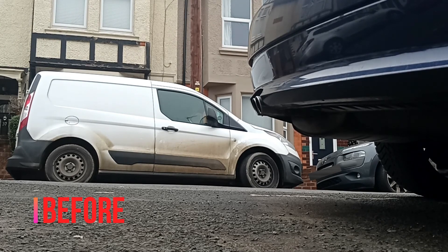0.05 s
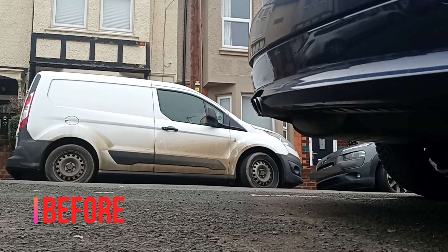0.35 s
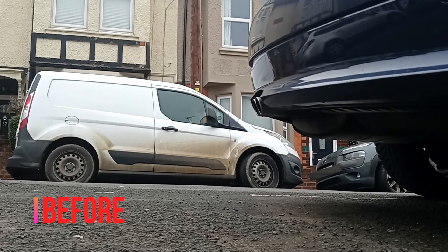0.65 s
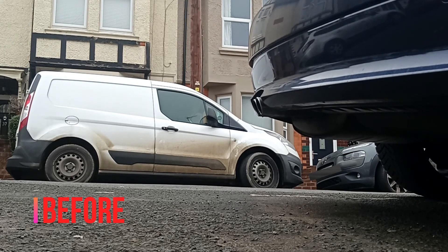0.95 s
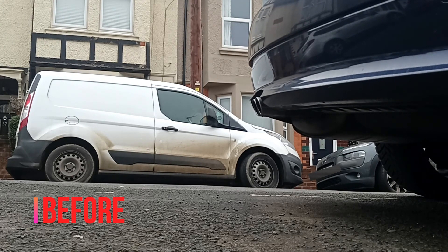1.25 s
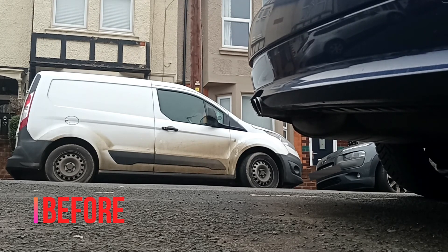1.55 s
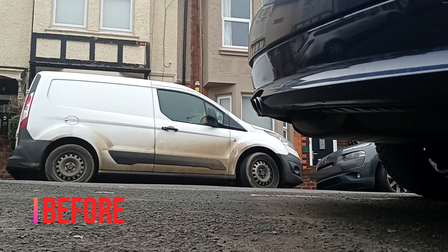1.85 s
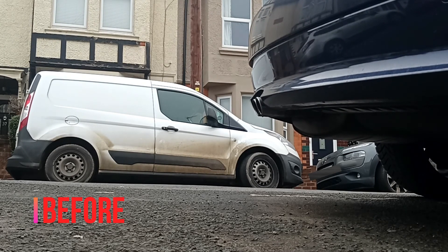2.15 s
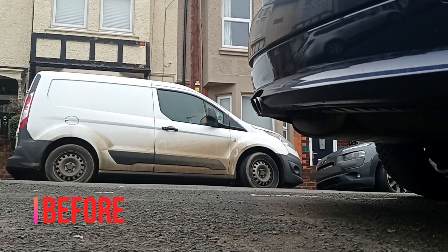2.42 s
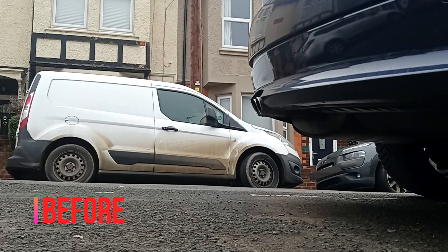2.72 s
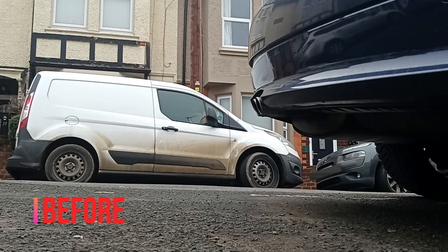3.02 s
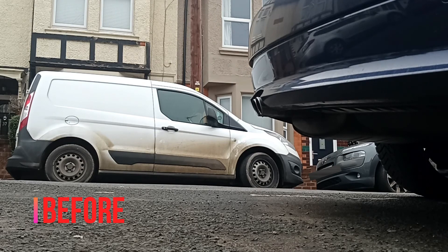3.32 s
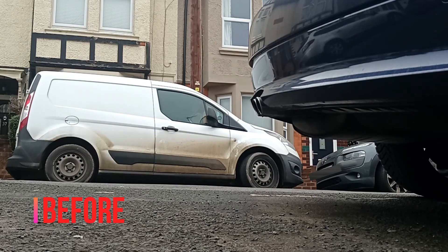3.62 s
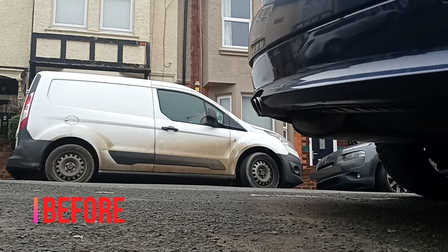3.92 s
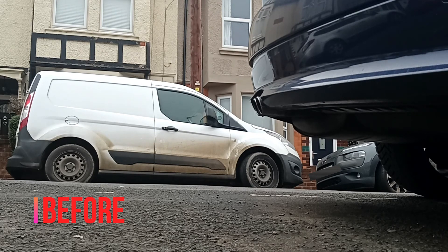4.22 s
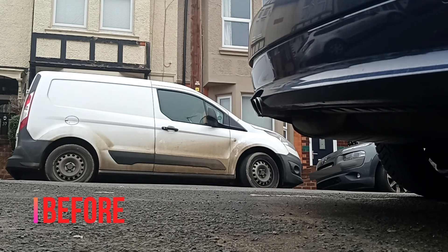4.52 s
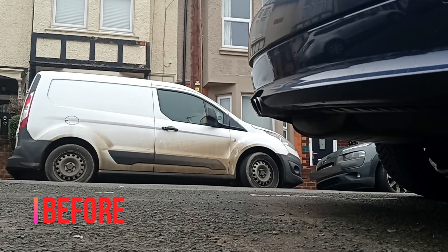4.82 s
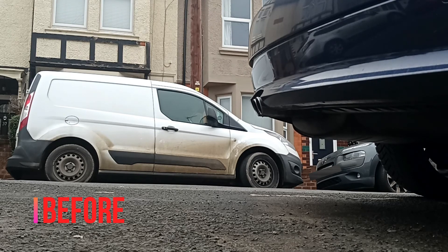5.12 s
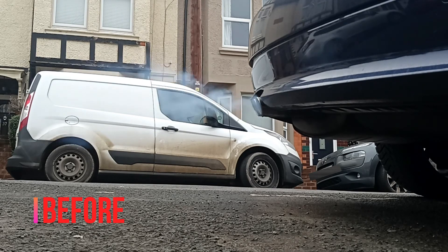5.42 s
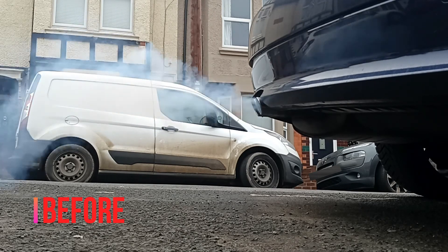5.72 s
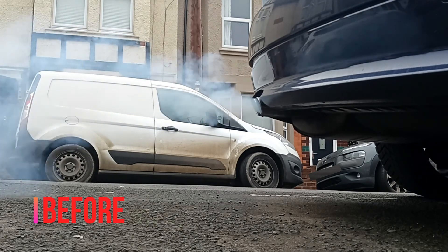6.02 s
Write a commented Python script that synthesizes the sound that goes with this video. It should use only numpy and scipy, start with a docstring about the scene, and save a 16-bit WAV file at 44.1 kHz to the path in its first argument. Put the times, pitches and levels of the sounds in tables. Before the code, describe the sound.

A faint, low hum of distant traffic lies under a quiet street, heard from the ground beside a car's tailpipe. For the first 2.5 seconds, keys jingle lightly in the cabin among small clicks, dull knocks and soft shuffling, with a sharper lock click and jingle at about 1.1 seconds. After a lull, the starter engages at 3.5 seconds with a gritty metallic clang. It cranks in quick, labouring surges, whining and clattering. At about 4.3 seconds the diesel engine catches with a close, loud roar and a hiss of exhaust gas, the loudest moment. It surges again near 4.8 seconds, then settles into a lumpy idle with a low throb, a rasping, ringing pipe and brief faint whistling notes. The engine stumbles for an instant around 5.6 seconds and is still running unevenly at the end, about 6 seconds in.

```python
"""Cold diesel start

A car starts in a street, heard from the ground beside its tailpipe. Keys jingle and controls
click in the cabin; the starter engages and labours as each piston squeezes its air. The four
cylinders catch with a roar and settle into a lumpy idle that rings the long exhaust pipe."""
import sys
import numpy as np
from scipy import signal
from scipy.fft import rfft, irfft, next_fast_len
from scipy.io import wavfile
from scipy.ndimage import map_coordinates

SR = 44100
rng = np.random.default_rng(int(sys.argv[2]) if len(sys.argv) > 2 else 0)


def waveform_to_disk(signal):
    """Save audio, clipped to [-1, 1], as 16-bit WAV at the path in sys.argv[1]."""
    frames = np.transpose(np.atleast_2d(signal))
    scaled = np.clip(frames, -1, 1) * 32767
    samples = np.round(scaled).astype(np.int16)
    wavfile.write(sys.argv[1], SR, samples)


N = 267373

# surges as the starter takes up the load and meets each compression:
# (time [s], length [s], load [dB], clatter [dB], drop in gear pitch [Hz], housing ring [dB])
STARTER_SURGES = [(3.505, 0.056, -32, -48.5, 5.56, -33.5), (3.588, 0.075, -35, -43.5, 12, -36),
                  (3.716, 0.062, -38.5, -39.5, 27.1, -41), (3.767, 0.058, -27, -43.5, 127, -53),
                  (3.908, .061, -27.5, -38.5, 89, -30), (4.045, 0.06, -28, -37, 76, -29),
                  (4.178, 0.077, -29.5, -37.5, 120, -29)]


def amp(db):
    """Turn decibels into a gain."""
    return 10 ** (np.asarray(db) / 20)


def unit(x):
    """Scale x to an average (rms) level of 1."""
    return x / np.sqrt(np.mean(x ** 2) + 1e-20)


def clock():
    """The time of every sample, in seconds."""
    return np.arange(N) / SR


def along(points, hz):
    """Read between (frequency, value) points on a logarithmic frequency scale."""
    freqs, values = np.transpose(points)
    return np.interp(np.log(hz + 1), np.log(np.abs(freqs) + 1), values)


def curve(points):
    """Join (time, value) points with straight lines."""
    return np.interp(clock(), *np.transpose(points))


def fade_in(start, length):
    """A ramp from 0 to 1."""
    return np.clip((clock() - start) / length, 0, 1)


def swell(start, length, rise_s, fall_s):
    """A level that rises, holds and dies away."""
    return fade_in(start, rise_s) * np.exp(-np.maximum(clock() - start - length, 0) / fall_s)


def burst(start, t60, attack):
    """The level of a blow: a quick rise, then a fall of 60 dB in t60 seconds."""
    age = np.maximum(clock() - start, 0)
    return np.exp(-np.log(1000) * np.minimum(age / t60, 10)) * (1 - np.exp(-age / attack))


def noise():
    """Fresh white noise."""
    return rng.standard_normal(N)


def wobble(rate):
    """A smooth curve through `rate` random values a second."""
    return map_coordinates(rng.standard_normal(int(N * rate / SR) + 4), [clock() * rate])


def tone(hz):
    """A slightly unsteady ringing note."""
    return np.sqrt(2) * np.sin(2 * np.pi * hz * clock() + 0.5 * wobble(90))


def filtered(x, response):
    """Multiply each frequency in x by response(frequency)."""
    size = next_fast_len(N + SR // 2)
    return irfft(rfft(x, size) * response(np.fft.rfftfreq(size, 1 / SR)), size)[..., :N]


def coloured(x, spectrum):
    """Shape x with (frequency [Hz], level [dB]) points, then scale it to level 1."""
    return unit(filtered(x, lambda hz: amp(along(spectrum, hz))))


def resonate(x, modes):
    """Let x ring resonances given as (pitch [Hz], width [Hz], level [dB]); scale to level 1."""
    return unit(filtered(x, lambda f: sum(
        (-1) ** k * amp(db) * 1j * f * width / (hz * hz - f * f + 1j * f * width)
        for k, (hz, width, db) in enumerate(modes))))


def low_pass(hz, edge_hz, steepness):
    """A gain near 1 below the edge and near 0 above it."""
    return 1 / (1 + (hz / edge_hz) ** steepness)


def street():
    """A low, slowly shifting hum of distant traffic."""
    # traffic hum: (frequency [Hz], level [dB])
    spectrum = [(12, -53), (20, -35), (37, -18), (90, -1), (153, -10.5), (259, -12), (306, -16.5),
                (352, -14), (393, -16.5), (519, -18.5), (811, -22.5), (958, -21), (8170, -42.5),
                (15500, -50.5)]
    # how alike left and right are: (frequency [Hz], likeness [-1 to 1])
    likeness = [(60, 0.86), (240, 0.88), (950, -0.18), (3770, 0.053), (15000, -0.079)]
    angle = lambda hz: np.arccos(np.clip(along(likeness, hz), -1, 1)) / 2
    shares = lambda hz: np.array([np.cos(angle(hz)), np.sin(angle(hz))])
    mid, side = filtered(np.array([noise(), noise()]), shares)
    hum = coloured(np.array([mid + side, mid - side]), spectrum)
    return amp(-59 + 1.8 * wobble(2.35)) * amp([[-0.5], [0.5]]) * hum


def keys():
    """Each jog clashes and rings the keys; they swing back and touch again, ever more softly."""
    # jogs of the bunch: (time [s], level [dB], extra clash [dB])
    jogs = [(0.083, -44.5, 2), (0.509, -54, -6), (0.624, -55, -8), (0.78, -47.5, 1), (1.142, -39, 5),
            (1.1807, -30, -8), (1.202, -28.5, -3), (1.324, -45, -15), (1.612, -51, -8), (1.973, -34, -0.5),
            (2.018, -47, 8.5), (2.122, -55.5, -2)]
    # notes of the keys: (pitch [Hz], width [Hz], level [dB])
    key_notes = [(5880, 50, -2), (6320, 60, -6), (6920, 79, 2.5), (7970, 90, -17), (9184, 100, -12),
                 (9700, 67, -8), (11060, 84, -3.5), (11770, 65, -13.5), (13100, 60, 2.5), (14640, 88, -9),
                 (15300, 82, -2)]
    # edges scraping: (frequency [Hz], level [dB])
    scrape = [(4000, -17), (6000, -13), (9000, -13.5), (12000, -7), (14500, 0), (15800, -12)]
    rebound_s, rebound_loss_db = 0.026, 15
    out = np.zeros(N)
    for s, db, clash_db in jogs:
        modes = [(hz * (1 + .009 * rng.normal()), width, level + rng.normal(0, 4.5))
                 for hz, width, level in key_notes]
        touches = [(s + rebound_s * (k + rng.uniform(-.4, .4) * (k > 0)), amp(-rebound_loss_db * k))
                   for k in range(3)]
        ring = sum(gain * burst(at, 0.12, 0.0012) for at, gain in touches) * resonate(noise(), modes)
        clash = sum(gain * burst(at, 0.041, .0003) for at, gain in touches) * coloured(noise(), scrape)
        out += amp(db - 11.5) * (ring + amp(clash_db + 3.5) * clash)
    return filtered(out, lambda hz: 1 - low_pass(hz, 5000, 8))


def blows():
    """List every click, thump and strike, all in the columns of `strikes`."""
    # small metal clicks of the lock and switches: (time [s], ring [dB], pitch [Hz])
    clicks = [(0.21, -48, 2090), (0.228, -41.5, 1745), (.25, -47.5, 1404), (0.567, -50, 4100),
              (0.584, -47.5, 1193), (0.625, -48, 4570), (0.683, -55.5, 4360)]
    # dull knocks of the controls: (time [s], ring [dB], snap [dB], pitch [Hz])
    thumps = [(1.169, -42.5, -45, 125.2), (1.17, -41, -50, 270), (1.263, -48, -35.5, 436),
              (1.433, -59.5, -49, 300), (1.672, -42.5, -30.5, 226.3), (1.678, -38, -33, 475),
              (1.682, -44.5, -57, 943), (2.192, -48, -55, 246.1), (2.403, -53.5, -46, 230),
              (2.67, -69, -57, 300)]
    # the lock bolt, the starter's magnetic switch and the drive taking up the load:
    # (time [s], snap [dB], thud [dB], pitch [Hz], ring [dB], decay [s])
    strikes = [(1.139, -30, -48, 4450, -27, 0.023), (1.144, -22.5, -35, 263, -32, 0.071),
               (3.456, -48, -33.5, 400, -44.5, 0.38), (3.523, -26, -33, 470, -32, 0.1),
               (3.54, -47, -39, 220, -25.5, 0.095)]
    light = [(s, db + 6.5, db - 14, hz, db, 0.11) for s, db, hz in clicks]
    dull = [(s, snap_db, db - 13.5, hz, db, 0.18) for s, db, snap_db, hz in thumps]
    return light + dull + list(strikes)


def knocks():
    """Each blow snaps, rings briefly and thuds the body panels, over soft shuffling."""
    # snap of a blow: (frequency [Hz], level [dB])
    snap_colour = [(300, -5), (550, 4.5), (1300, 5.5), (2500, 0), (4500, 0.5), (7500, -6), (10000, -27),
                   (15500, -52)]
    # body panel notes: (pitch [Hz], width [Hz], level [dB])
    panels = [(122, 76, -10), (284, 130, -11.5), (634, 86, -9)]
    # movements on the seat: (time [s], length [s], level [dB])
    shuffles = [(0.132, 0.17, -53.5), (0.605, 0.17, -57), (2.407, 0.26, -64)]
    seat_colour = [(80, -8), (220, 0.5), (420, -6.5), (900, -31), (4000, -24.5), (9000, -36),
                   (15000, -47)]
    hits = blows()
    snap = sum(amp(db) * burst(s - .002, t60, 0.0011) for s, db, *_, t60 in hits)
    thud = sum(amp(db) * burst(s, t60, 0.0027) for s, _, db, *_, t60 in hits)
    rough_note = lambda hz: unit(tone(hz) + 1.17 * resonate(noise(), [(hz, 0.14 * hz, 0)]))
    ring = sum(amp(db) * burst(s, t60, 0.0021) * rough_note(hz) for s, _, _, hz, db, t60 in hits)
    moving = sum(amp(db) * swell(s, length, rise_s=0.023, fall_s=0.041) for s, length, db in shuffles)
    shuffle = moving * coloured(noise(), seat_colour)
    grit = coloured(unit(noise() * amp(6.2 * wobble(300))), snap_colour)
    return amp(-12) * snap * grit + amp(-2) * thud * resonate(noise(), panels) + ring + shuffle


def pinion():
    """The starter's small gear ticks forward, then slams into the flywheel with a gritty clang."""
    # steel teeth meeting: (time [s], level [dB], decay [s])
    contacts = [(3.421, -62, 0.22), (3.447, -54.5, 0.18), (3.483, -40, 0.14), (3.495, -25.5, 0.098),
                (3.517, -37, 0.053)]
    # their clang: (frequency [Hz], level [dB])
    clang = [(400, -20), (900, -0.5), (1700, -0.5), (2600, 3), (3400, -1.5), (4100, -3.5), (5200, -6),
             (6800, -4), (8500, -13), (11000, -16), (15500, -39)]
    level = sum(amp(db) * burst(s, t60, 0.00059) for s, db, t60 in contacts)
    return level * coloured(noise() * amp(2.8 * wobble(500)), clang)


def gear_pitch():
    """Pitch of the starter gear in Hz: it spins up and is dragged down by each compression."""
    engage_s, engage_hz, climb_hz_per_s, free_hz = 3.45, 139.85, 410, 314.7
    lag_s, half_sag_s = 0.01212, .048  # slowest just after each surge
    unloaded = np.clip(engage_hz + climb_hz_per_s * (clock() - engage_s), engage_hz, free_hz)
    sag = sum(sag_hz * np.exp(-((clock() - s - length - lag_s) / half_sag_s) ** 2)
              for s, length, _, _, sag_hz, _ in STARTER_SURGES)
    return unloaded - sag


def cranking():
    """Strength of load and clatter: a steady churn, with a surge as each piston passes the top."""
    surges = [(swell(s, length, 0.0066, 0.012), load_db, clatter_db)
              for s, length, load_db, clatter_db, *_ in STARTER_SURGES]
    engaged = fade_in(3.485, 0.014) * (1 - fade_in(4.3, 0.15))
    load = amp(-37.5) + sum(amp(db) * surge for surge, db, _ in surges)
    clatter = amp(-39) + sum(amp(db) * surge for surge, _, db in surges)
    return load * engaged, clatter * engaged


def starter():
    """The gear whines against each compression, which rings the housing and pumps air down the pipe."""
    # gear whine: (multiple of the gear pitch, level [dB])
    overtones = [(1, -3), (2, 2), (3, -10), (4, -4), (5, -8.5), (6, -7)]
    # how the starter's casing colours it: (frequency [Hz], gain [dB])
    casing = [(150, -10), (212, 10.5), (270, -1), (380, 1), (450, 1), (530, -0.5), (605, 0), (700, 3),
              (900, -0.5)]
    # notes of the housing round the flywheel: (pitch [Hz], level [dB])
    housing_notes = [(608, -2.5), (1035, -8.5), (1368, -10.5), (1823, -16)]
    # pumped air: (frequency [Hz], level [dB])
    air = [(30, -40), (70, -5.5), (120, -6), (260, -2), (380, 3.5), (500, 0), (720, -4.5), (900, -9),
           (1400, -62)]
    gear_hz = gear_pitch()
    teeth = np.cumsum(gear_hz * (1 + 0.028 * wobble(120))) / SR
    judder_db = lambda: 2.2 * wobble(90)
    whine = unit(sum(amp(db + along(casing, k * gear_hz) + judder_db()) * np.sin(2 * np.pi * k * teeth)
                     for k, db in overtones))
    growl = coloured(noise() * amp(2.6 * wobble(120)), air)
    strain = sum(amp(db) * swell(s, 0.032, rise_s=0.018, fall_s=0.02) for s, *_, db in STARTER_SURGES)
    housing = unit(sum(amp(db + judder_db()) * np.sin(2 * np.pi * hz * clock() + 0.56 * wobble(50))
                       for hz, db in housing_notes))
    load, _ = cranking()
    return load * (amp(-4) * whine * fade_in(3.51, 0.07) + amp(-7) * growl) + amp(3) * strain * housing


def rattle():
    """Valve gear and starter teeth clatter as the engine is turned over."""
    # metal clatter: (frequency [Hz], level [dB])
    spectrum = [(400, -41), (700, -13), (1000, -0.5), (1230, -10.5), (1360, 1), (1480, -8), (1830, -4.5),
                (2300, -10.5), (3200, -11), (3800, -14.5), (4470, -17), (6500, -15.5), (8720, -33.5),
                (12900, -37), (15500, -58)]
    teeth = np.cumsum(gear_pitch()) / SR
    chatter = unit(noise() * amp(2 * np.cos(2 * np.pi * teeth) + 0.5 * wobble(120)))
    _, clatter = cranking()
    return amp(-2.5) * clatter * coloured(chatter, spectrum)


def firings():
    """One pulse for each firing; cold cylinders fire unevenly in time and strength."""
    # engine speed: (time [s], firings [per s])
    speed = [(4.3, 29.7), (4.38, 42.1), (4.45, 48), (4.55, 40.4), (4.7, 40.2), (4.85, 43.8), (5.1, 43),
             (5.3, 42), (5.6, 42), (5.9, 43.5), (6.06, 43.7)]
    # strength of each of the four cylinders [dB]
    cylinders = [-1.2, -2, -1.5, -2]
    count = np.floor(np.cumsum(curve(speed)) / SR)
    times = clock()[np.flatnonzero(np.diff(count))]
    timing, strength = rng.standard_normal((len(times), 2)).T
    samples = np.clip((times + 0.00075 * timing) * SR, 0, N - 1).astype(int)
    return np.bincount(samples, amp(np.resize(cylinders, len(times)) + 1.8 * strength), N)


def combustion():
    """Levels of bark, rasp and jet in dB: the power of each surge adds to that of the idle."""
    # surges of burning fuel: (time [s], length [s], bark [dB], rasp [dB], jet [dB])
    surges = [(4.296, 0.04, -28.5, -31.5, -34), (4.348, .18, -23.5, -26, -32.5),
              (4.561, 0.084, -31.5, -36.5, -46.5), (4.65, 0.2, -43, -40, -52),
              (4.765, 0.029, -28, -39, -55), (4.79, 0.066, -31.5, -30, -40),
              (4.882, 0.16, -38, -43.5, -51.5), (4.999, 0.13, -34.5, -37.5, -47.5),
              (5.24, 0.054, -57, -40.5, -50), (5.356, 0.075, -59, -42.5, -50.5),
              (5.53, 0.12, -40.5, -38.5, -49), (5.64, 0.059, -42, -50, -52.5),
              (5.755, 0.062, -38.5, -37.5, -44.5), (5.83, 0.12, -36.5, -41, -49),
              (6.023, 0.034, -44.5, -46, -51.5)]
    # levels between surges: (bark [dB], rasp [dB], jet [dB])
    idle = [-44, -45.5, -57.5]
    shapes = np.array([swell(s, length, rise_s=0.016, fall_s=0.027) for s, length, *_ in surges])
    strengths = amp([levels for _, _, *levels in surges])
    return 10 * np.log10(amp(idle)[:, None] ** 2 + strengths.T ** 2 @ shapes ** 2)


def alight():
    """A gain that rises as the fuel catches and dips briefly at each misfire."""
    # misfires: (time [s], half length [s], dip [dB])
    misfires = [(5.486, 0.013, -2.5), (5.622, 0.0099, -43), (5.73, 0.016, -5.5)]
    dips_db = sum(db * np.exp(-((clock() - s) / half) ** 2) for s, half, db in misfires)
    return amp(dips_db) * fade_in(4.293, .03) ** 2


def gas(pulses, t60, steady):
    """Swirling gas puffs after each valve opens, on top of a steady flow."""
    puff = unit(signal.fftconvolve(pulses, burst(0, t60, 0.0086)[:SR // 4])[:N])
    return unit(noise() * (puff + steady) * amp(2.2 * wobble(70)))


def exhaust(pulses):
    """Each firing thumps the silencer box and rings the long pipe; hard firing wakes a broad roar."""
    # note of the air in the silencer: (pitch [Hz], width [Hz], level [dB])
    box_note = [(127.4, 33.4, 0)]
    # the silencer's bass: (time [s], level [dB])
    boom_levels = [(4.3, -41), (4.368, -30.5), (4.524, -25.5), (4.774, -41.5), (4.818, -28), (4.98, -36.5),
                   (5.098, -27), (5.314, -38.5), (5.334, -47), (5.416, -34.5), (5.612, -39.5), (5.632, -49),
                   (5.672, -38), (5.746, -46.5), (5.828, -32.5), (5.932, -31.5), (5.99, -33.5), (6.06, -49)]
    # notes along the pipe: (pitch [Hz], width [Hz], level [dB])
    pipe_notes = [(207.6, 10, 2.5), (249, 14, -0.5), (285, 15, 1.5), (332.4, 12, 2), (372, 9.9, 0.5),
                  (401, 22, -2.5), (455, 24, -6), (485.6, 17.4, -4.5), (576, 30, -8.5), (624, 24, -5.5)]
    # broad roar: (frequency [Hz], level [dB])
    roar_colour = [(25, -27), (60, 2), (90, -1), (140, 2), (200, 1.5), (320, -2.5), (480, -1.5), (620, -8),
                   (760, -11), (1200, -72)]
    bark_db, _, _ = combustion()
    roar_share = np.clip((bark_db + 40.5) / 26, .05, .7)
    paths = (noise() * burst(0, 0.042, 0.00099))[:SR // 8]  # the same silencer echoes for every firing
    thumps = unit(signal.fftconvolve(pulses, paths)[:N])
    roar = coloured(thumps + 1.2 * gas(pulses, 0.037, .4), roar_colour)
    box = resonate(unit(pulses) + 0.34 * gas(pulses, 0.064, 0.22), box_note)
    pipe = resonate(unit(pulses) + gas(pulses, 0.071, 0.12), pipe_notes)
    with_roar = lambda ring: np.sqrt(1 - roar_share) * ring + np.sqrt(roar_share) * roar
    outlet_hz = 69  # the narrow outlet gives off little below this
    boom = filtered(with_roar(box), lambda hz: low_pass(hz, 205, 10) * (1 - low_pass(hz, outlet_hz, 5)))
    bark = filtered(with_roar(pipe), lambda hz: 1 - low_pass(hz, 180, 10))
    return (amp(curve(boom_levels) + 0.26) * unit(boom) + amp(bark_db) * unit(bark)) * alight()


def tip(pulses):
    """Gas rasps and hisses out of one of the twin tips; each firing knocks its ringing metal anew."""
    # notes across the silencer and tip: (pitch [Hz], width [Hz], level [dB])
    notes = [(866, 32, -2), (950, 35, -13), (1060, 48, -0.5), (1224, 28, -2), (1478, 25, 2),
             (1935, 36, 0.5), (2070, 65, -1.5), (2580, 34, -5), (2766, 30, -9), (3135, 65, -10),
             (3540, 86, -6), (3937, 55, -5), (4307, 130, 2.5), (4660, 74, -0.5), (5700, 55, -6),
             (6200, 90, -17)]
    # the gas's low rasp, higher jet and topmost fizz, each: (frequency [Hz], level [dB])
    rasp_colour = [(350, -15), (600, -4), (754, -18.5), (869, 0), (1150, -5), (1320, -12.5), (1470, 2),
                   (1630, -12.5), (1850, -5.5), (2410, -12), (3300, -18), (4290, -57), (7260, -120)]
    jet_colour = [(1760, -32), (3000, -11), (3700, -8), (4050, -1.5), (4350, -6), (4520, -5.5), (4700, -8),
                  (5160, -4.5), (6340, -4.5), (8640, -32.5), (15500, -44)]
    fizz_colour = [(5000, -20), (7000, 11.5), (8500, -1), (11000, -0.5), (14000, -15), (15500, -28)]
    # fizz, which only fast gas makes: (time [s], level [dB])
    fizz_levels = [(4.31, -46), (4.53, -47), (4.58, -58), (4.7, -65), (4.85, -71), (4.92, -67.5),
                   (6.06, -73.5)]
    _, rasp_db, jet_db = combustion()
    knock = gas(pulses, 0.037, 0.3)
    ring = lambda modes: unit(sum(amp(db + 2.5 * wobble(12)) * resonate(knock, [(hz, width, 0)])
                                  for hz, width, db in modes))
    low_ring = ring([note for note in notes if note[0] < 3000])
    high_ring = ring([note for note in notes if note[0] >= 3000])
    high_ring = coloured(high_ring, [(2000, -23), (3000, 1), (6300, -2), (8500, -20)])
    # the metal rings no harder above a certain flow, so the full roar is broad noise
    low_ring *= amp(np.minimum(rasp_db, -35) - 4)
    high_ring *= amp(np.minimum(jet_db, -41) - 0.5)
    rasp = amp(rasp_db - 4) * coloured(gas(pulses, 0.1, 1.9), rasp_colour)
    ringing_rasp = filtered(rasp + low_ring, lambda hz: low_pass(hz, 4200, 6))
    jet = amp(jet_db - 3) * coloured(gas(pulses, 0.073, 1.0), jet_colour)
    fizz = amp(curve(fizz_levels)) * coloured(gas(pulses, 0.18, 0.9), fizz_colour)
    return (ringing_rasp + jet + high_ring + fizz) * alight()


def singing():
    """Now and then the gas jet catches one note of the tip and makes it sing."""
    # sung notes: (time [s], length [s], pitch [Hz], level [dB])
    notes = [(4.45, 0.078, 1472, -39), (4.78, 0.034, 1935, -32), (5.03, .02, 1935, -48),
             (5.196, .04, 1462, -43), (5.242, 0.14, 2574, -47), (5.665, .025, 1935, -42),
             (5.896, .08, 2574, -47), (5.963, 0.047, 1462, -48.5)]
    flutter = lambda hz: unit(1.1 * tone(hz) + resonate(noise(), [(hz, 40, 0)]))
    return sum(amp(db) * swell(s, length, .012, 0.014) * flutter(hz) for s, length, hz, db in notes)


def place(x, lag_s, pan):
    """Make x stereo: direct sound reaches the left late; road, car and house fronts scatter the rest."""
    # echo against direct sound: (frequency [Hz], level [dB])
    scatter = [(130, -13.5), (300, -10.5), (700, 1.5), (1500, 5), (12000, -0.5)]
    # how long the echo lasts: (frequency [Hz], time to fall 60 dB [s])
    decay = [(150, 0.19), (1500, 0.082), (12000, 0.12)]
    freqs, times, spectra = signal.stft(rng.standard_normal((2, SR // 4)), SR, nperseg=256)
    _, tail = signal.istft(spectra * amp(-60 * times / along(decay, freqs)[:, None]), SR, nperseg=256)
    echo = signal.fftconvolve(x[None], tail / np.linalg.norm(tail[0]), axes=1)[:, :N]
    echo_gain = lambda hz: amp(along(scatter, hz))
    side = np.array([[.5], [-.5]])
    direct = filtered(x, lambda hz: np.exp(-2j * np.pi * hz * side * lag_s))
    both = direct + filtered(echo, echo_gain)
    return filtered(both, lambda hz: amp(side * along(pan, hz)) / np.hypot(1, echo_gain(hz)))


def scene():
    """Cabin and engine lie at the far end of the car, the twin tailpipe tips close by."""
    # balance of the car's front and tail, each: (frequency [Hz], left minus right [dB])
    front_pan = [(60, -4), (200, -2.5), (2400, -0.5), (4400, 1), (8100, 2.5), (15000, -24)]
    tail_pan = [(60, -5.5), (200, -0.5), (700, -2), (2400, 1.5), (4400, 4), (8100, 3), (15000, -23.5)]
    pulses = firings()
    front = place(knocks() + pinion() + starter() + rattle(), lag_s=0.000446, pan=front_pan)
    underbody = place(rattle(), lag_s=0.00038, pan=front_pan)
    jingle = place(keys(), lag_s=0.00048, pan=[(6000, 14.5), (9000, -10), (12000, -15.5)])
    near_tip = place(exhaust(pulses) + tip(pulses) + singing(), lag_s=.00003, pan=tail_pan)
    far_tip = place(tip(pulses), lag_s=.00006, pan=tail_pan)
    return front + underbody + jingle + near_tip + far_tip + street()


def record(dry):
    """Cut away the very highest treble."""
    top_hz, fade_hz = 15850, 600
    return filtered(dry, lambda hz: np.sin(np.pi / 2 * np.clip((top_hz - hz) / fade_hz, 0, 1)) ** 2)


dry = scene()
out = record(dry)
waveform_to_disk(out)
```